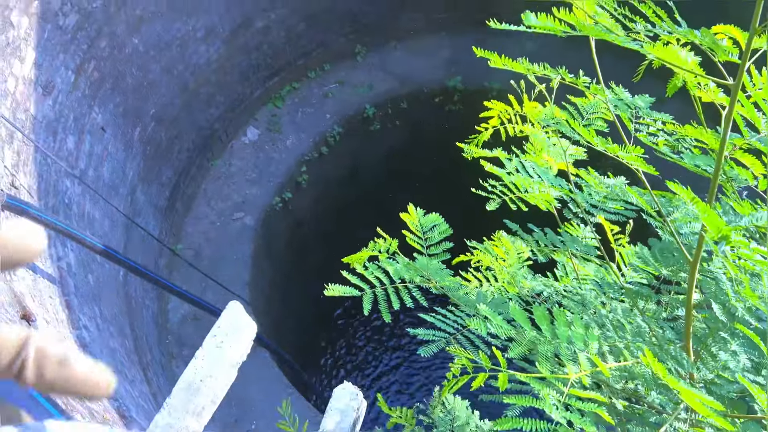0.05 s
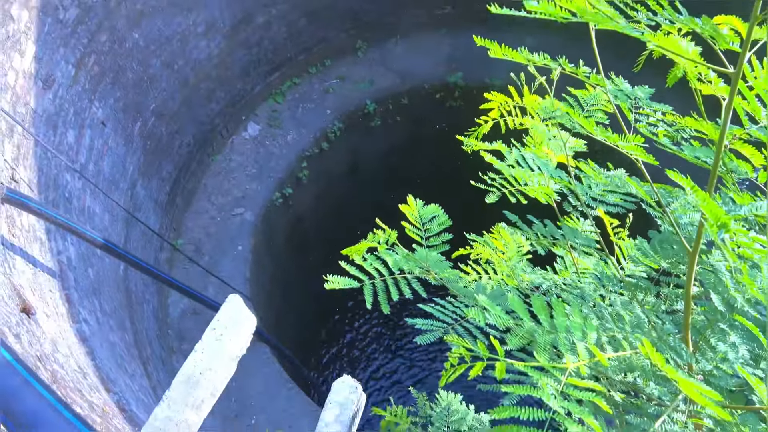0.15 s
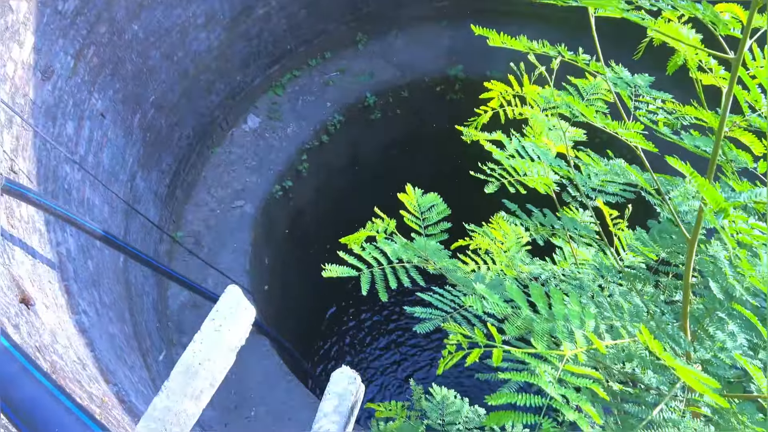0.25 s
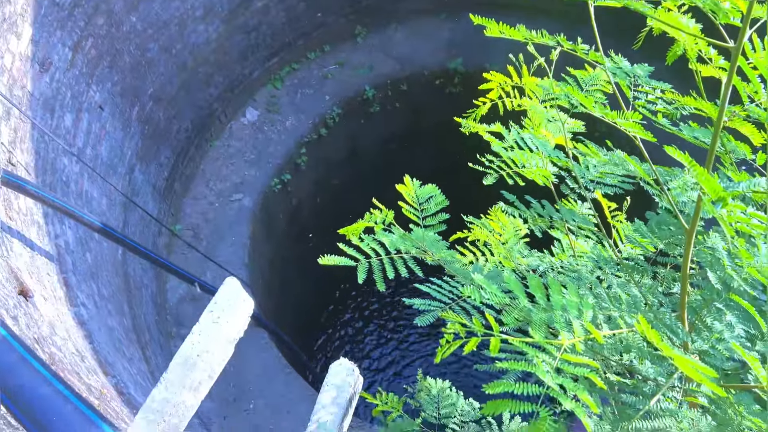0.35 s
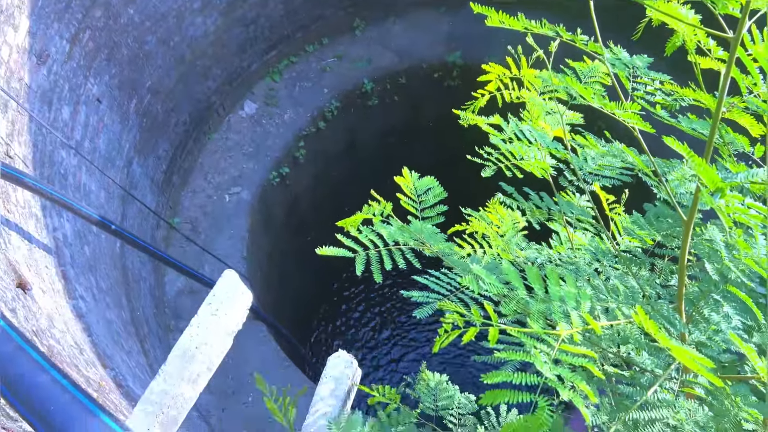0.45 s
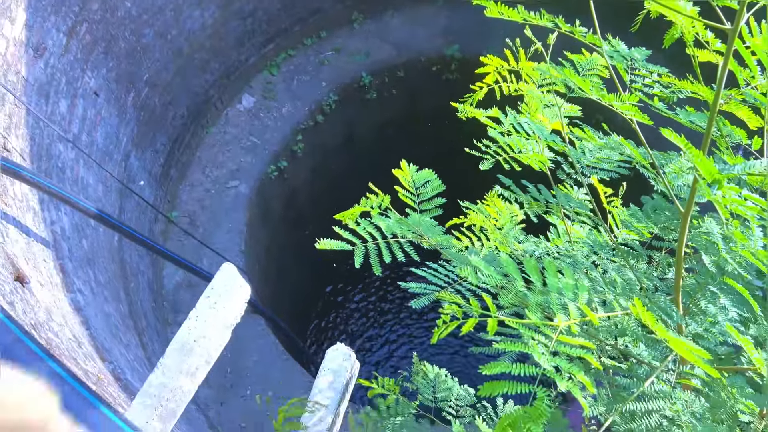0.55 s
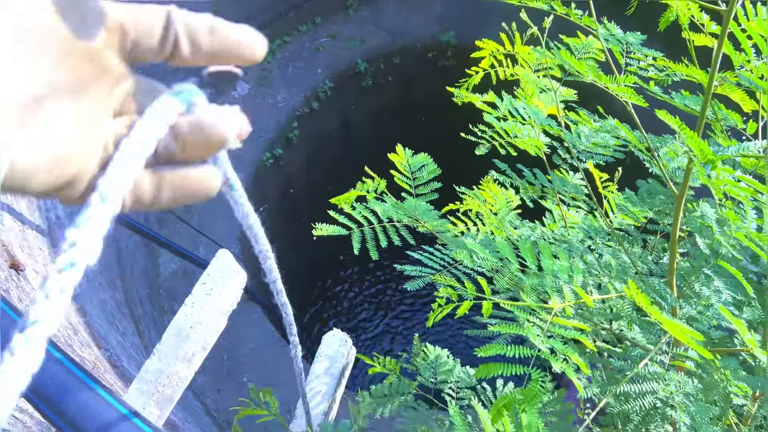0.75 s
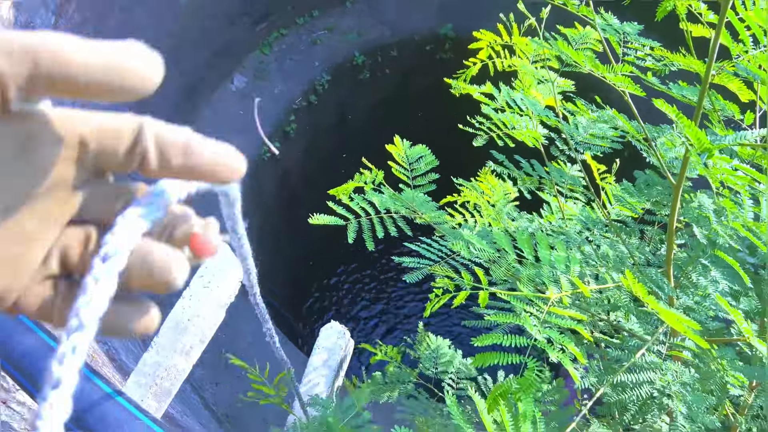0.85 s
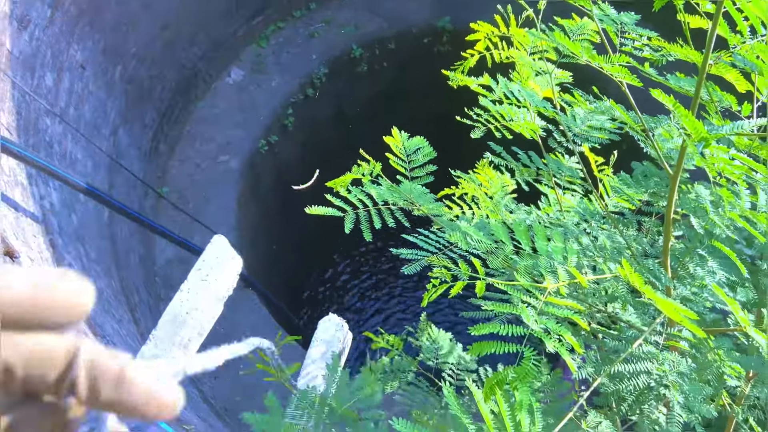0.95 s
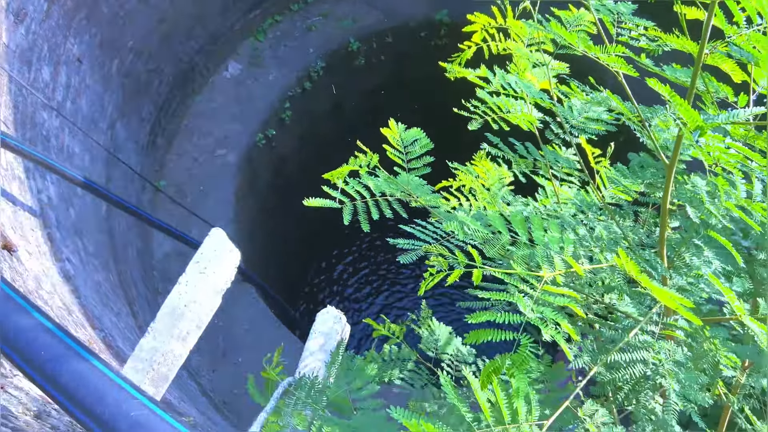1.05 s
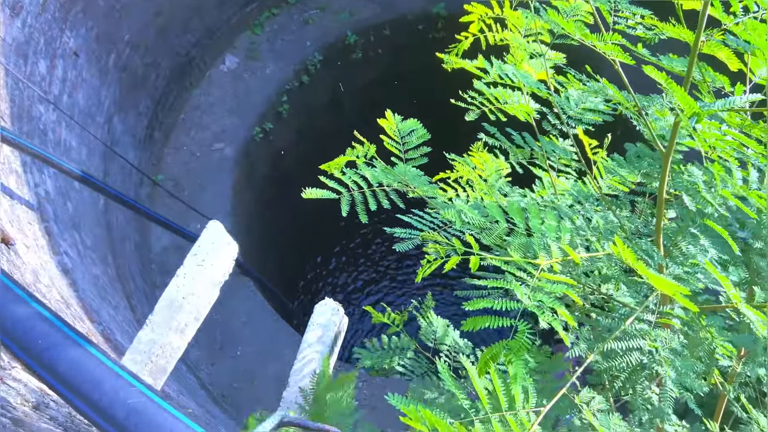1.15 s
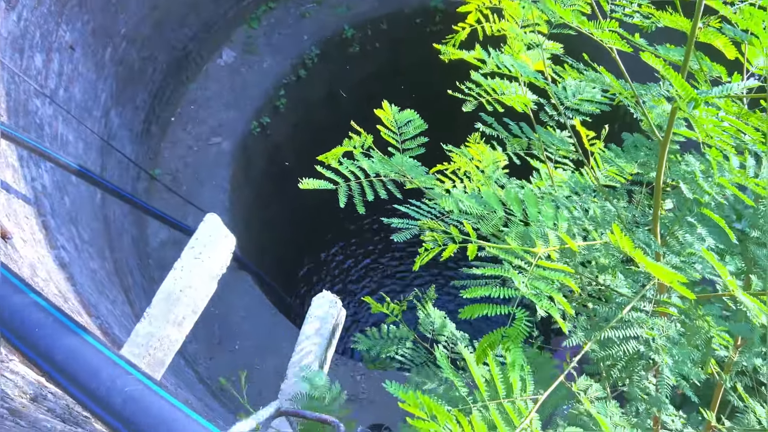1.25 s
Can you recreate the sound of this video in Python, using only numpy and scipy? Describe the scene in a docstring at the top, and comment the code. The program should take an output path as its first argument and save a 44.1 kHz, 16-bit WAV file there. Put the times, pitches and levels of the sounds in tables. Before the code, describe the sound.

Something hits the water in a stone well with a low, echoing thud and muffled splash.

```python
"""A breath of leaves and outdoor air, then a dull slap: something has dropped into a deep stone well.
A hollow boom throbs up the shaft with a muffled splash, and the air column rings on in beating
resonances among the wall echoes. Three drips plop on the water. At the rim a rope is handled, all soft
bumps and brief scuffs, while the leaves crackle on over a bed of hiss and faint rumble."""
import sys
import numpy as np
from scipy import signal
from scipy.fft import rfft, irfft
from scipy.io import wavfile
from scipy.ndimage import uniform_filter1d

SR = 44100
rng = np.random.default_rng(int(sys.argv[2]) if len(sys.argv) > 2 else 0)


def dump_mix(stems):
    """Bounce the given channels to the path in sys.argv[1] as a 16-bit WAV at rate SR."""
    frames = np.atleast_2d(stems).T  # one column per channel
    limited = np.clip(frames, -1, 1)  # hard clip at full scale
    pcm = np.round(limited * 32767).astype(np.int16)
    wavfile.write(sys.argv[1], SR, pcm)


N = 57330
T = np.arange(N) / SR

# Body of the slap: (frequency [Hz], relative level [dB], 60 dB decay time [s])
SLAP_RESONANCES = [(160, -1.5, .08), (328.6, -2.5, 0.12), (426, -7.5, 0.079), (748, 4, 0.016),
                   (878, -6.5, 0.034), (1287, -11.5, 0.054), (1430, -37, .016)]
# Pulses of the boom: (time [s], pitch [Hz], level [dB], attack [s], left over right [dB])
BOOM_THROBS = [(0.2429, 304, -12.5, 0.01, 2.5), (0.258, 142, -19.5, 0.0097, 3),
               (.263, 439.5, -30.5, 0.0091, -14), (.264, 281, -15, 0.0045, 13),
               (.277, 283.5, -11, 0.014, 10.5), (.305, 303.2, -16.5, 0.018, 10),
               (.318, 149, -22.5, 0.016, 5), (.362, 309, -34.5, 0.011, 9), (.37, 157, -25.5, 0.0096, 2),
               (.445, 292, -30.5, 0.014, 13)]
# Tone of the muffled splash: (frequency [Hz], relative level [dB])
SPLASH_EQ = [(60, -11), (100, 3), (210, 1), (380, 2), (470, -2), (580, -1.5), (720, -12), (1300, -19.5),
             (1900, -22.5), (5000, -55)]
# Ring of the air column: (frequency [Hz], relative level [dB], 60 dB decay time [s])
SHAFT_RESONANCES = [(101, -13, 0.28), (127, -1, 0.34), (145.2, -13, 0.71), (151.4, -7, 1.62),
                    (171, -20, 1.5), (268.1, 2, 0.53), (305.3, -4.5, 0.63), (307.2, -9, 1.36),
                    (316, -8, 0.57)]
# Tone of the boom's wall echoes: (frequency [Hz], relative level [dB])
ECHO_EQ = [(60, -30), (100, -10), (148, 1.5), (205, -8), (262, 1), (305, 7.5), (370, -12.5), (560, -22),
           (900, -20), (1400, -24), (2200, -61)]
# Drips on the water: (time [s], pitch [Hz], level [dB], attack [s])
DRIP_CUES = [(.481, 798, -31, 0.0054), (.517, 820, -38.5, 0.0046), (1.192, 783, -37, 0.0046)]
# Tone of the drips' wall echoes: (frequency [Hz], relative level [dB])
DRIP_ECHO_EQ = [(300, -30), (600, -11), (800, -13), (950, -5), (1200, -7), (2500, -31)]
# Handling bumps at the rim: (time [s], pitch [Hz], level [dB], attack [s])
BUMP_CUES = [(.818, 251, -44.5, 0.0073), (.847, 251, -34, 0.0042), (.849, 375, -38, 0.003),
             (0.852, 131.5, -38.5, 0.01), (0.889, 145.5, -44, 0.043), (.978, 254, -35, 0.0056),
             (.995, 250.5, -43, 0.015), (1.0, 59, -55, 0.0092), (1.081, 63.7, -41.5, 0.0089),
             (1.087, 114, -44, 0.0078), (1.144, 233, -39, 0.004)]
# Rope scuffs: (time [s], band centre [Hz], level [dB], attack [s])
SCUFF_CUES = [(.362, 4700, -35.5, .004), (.592, 3200, -35, .002), (.811, 1360, -38.5, 0.0047),
              (.846, 1310, -40.5, .006), (1.14, 3850, -45, 0.0028), (1.2005, 3470, -29.5, 0.0019)]
# Rise and fall of the leaves: (time [s], level [dB])
LEAF_FADER = [(0, -55), (.06, -45), (.18, -46.5), (.26, -46), (.29, -40), (.325, -48), (.35, -42),
              (.5, -41.5), (.66, -47), (.815, -42.5), (.845, -38.5), (.9, -38), (.96, -43), (.995, -41.5),
              (1.06, -46.5), (1.115, -38.5), (1.2, -41.5), (1.3, -48.5)]
# Tone of the leaves: (frequency [Hz], relative level [dB])
LEAF_EQ = [(300, -5), (1000, -4.5), (2000, -0.5), (3000, -1.5), (4600, 2), (7000, -3), (10000, -7),
           (13000, -7.5), (15500, -21)]
# Air hiss common to both ears: (frequency [Hz], relative level [dB])
AIR_MID_EQ = [(350, -17), (430, -11.5), (620, -5), (780, 2), (1000, -6), (1290, -2.5), (1820, -11),
              (2750, -4), (4700, -8), (7050, -10.5), (9700, -18.5), (12800, -10), (15000, -20.5)]
# Air hiss opposite in the two ears: (frequency [Hz], relative level [dB])
AIR_SIDE_EQ = [(350, -13), (450, -18), (750, -1), (1000, -5), (1500, 1), (2200, -8.5), (3400, -3.5),
               (8000, -12), (10000, -6), (12500, -32), (15000, -11.5)]
# Tone of the rumble: (frequency [Hz], relative level [dB])
RUMBLE_EQ = [(20, -19), (40, -20), (62, 1.5), (100, -9.5), (148, -1.5), (200, -13), (260, -8), (400, -17),
             (900, -36)]
# Rise and fall of the rumble: (time [s], level [dB])
RUMBLE_FADER = [(0, -55), (.78, -52.5), (.9, -47.5), (1.1, -51), (1.3, -53)]

WELL_PAN_DB, WELL_WIDTH = 4.5, 0.62
SLAP_AT_S, SLAP_ATTACK_S, SLAP_GAIN_DB = 0.2305, 0.0011, -19.5
SHAFT_AT_S, SHAFT_ATTACK_S, SHAFT_GAIN_DB = 0.252, 0.011, -24
ECHO_GAIN_DB, ECHO_T60_S = -27.5, 1
DRIP_SEND_DB, DRIP_ECHO_T60_S = -16.5, 0.44
SCUFF_STEP_OCTAVES = 0.42
CRACKLES_PER_S, CRACKLE_SPREAD_DB, CRACKLE_DECAY_S = 900, 2, 0.0021
AIR_MID_GAIN_DB, AIR_SIDE_GAIN_DB, AIR_FLICKER_DB = -42.5, -41.5, 2.28
TOP_HZ = 15300


def slap():
    """The hit: the impact sets off short resonances, with a softened edge and trimmed bass."""
    attack = 1 - np.exp(-since(SLAP_AT_S) / SLAP_ATTACK_S)
    body = highpass(attack * ring(SLAP_AT_S, SLAP_RESONANCES), hz=168)
    return pan(undb(SLAP_GAIN_DB) * body, WELL_PAN_DB)


def boom():
    """Hollow, overlapping pulses of resonance throb up the shaft."""
    return sum(pan(throb(start, hz, db, attack, shape=2.7), pan_db)
               for start, hz, db, attack, pan_db in BOOM_THROBS)


def splash():
    """The water gives one muffled burst of dark noise."""
    envelope = undb(-26) * swell(start=0.248, attack=0.015)
    return pan(envelope * wide_noise(SPLASH_EQ, WELL_WIDTH), WELL_PAN_DB)


def shaft():
    """The air in the well builds up and rings on in close, beating modes, among scattered wall echoes."""
    age = since(SHAFT_AT_S)
    build = 1 - np.exp(-age / SHAFT_ATTACK_S)
    echoes = undb(ECHO_GAIN_DB - 60 * age / ECHO_T60_S) * wide_noise(ECHO_EQ, WELL_WIDTH)
    modes = undb(SHAFT_GAIN_DB) * ring(SHAFT_AT_S, SHAFT_RESONANCES)
    return pan(build * (modes + echoes), WELL_PAN_DB)


def drips():
    """Small plops on the water, each trailing a faint wash from the walls."""
    plops = sum(throb(start, hz, db, attack) for start, hz, db, attack in DRIP_CUES)
    tails = sum((T > start + attack) * undb(db - 60 * since(start) / DRIP_ECHO_T60_S)
                for start, _, db, attack in DRIP_CUES)
    wash = np.array([noise(DRIP_ECHO_EQ), noise(DRIP_ECHO_EQ)])
    return pan(plops, db=-5.5) + undb(DRIP_SEND_DB) * tails * wash


def rope():
    """A rope handled at the rim: soft, low bumps and brief scuffs of band noise."""
    bumps = sum(throb(start, hz, db, attack, shape=0.81) for start, hz, db, attack in BUMP_CUES)
    scuffs = np.zeros((2, N))
    for start, hz, db, attack in SCUFF_CUES:
        band = [(hz * 2 ** (step * SCUFF_STEP_OCTAVES), -6 * step ** 2) for step in range(-3, 4)]
        scuffs += undb(db) * swell(start, attack, shape=0.76) * np.array([noise(band), noise(band)])
    return pan(bumps, db=5.5) + scuffs


def leaves():
    """Dense, tiny crackles of uneven size blur into a wide rustle."""
    sizes = undb(CRACKLE_SPREAD_DB * np.minimum(rng.exponential(size=N), 5))
    triggers = rng.random(N) < CRACKLES_PER_S / SR
    decay = np.exp(-1 / (CRACKLE_DECAY_S * SR))
    energy = signal.lfilter([1], [1, -decay], (sizes * triggers) ** 2)
    mid, side = (equalise(np.sqrt(energy) * rng.standard_normal(N), LEAF_EQ) for _ in range(2))
    return fader(LEAF_FADER) * mid_side(mid, 0.88 * side)


def air():
    """The outdoor bed: a wide, lightly flickering hiss over a faint rumble."""
    mid = undb(AIR_MID_GAIN_DB) * noise(AIR_MID_EQ)
    side = undb(AIR_SIDE_GAIN_DB) * noise(AIR_SIDE_EQ)
    hiss = highpass(mid_side(mid, side), hz=357)
    rumble = fader(RUMBLE_FADER) * wide_noise(RUMBLE_EQ, width=0.39)
    flicker = undb(AIR_FLICKER_DB * wander(rate_hz=41.07))
    return hiss * flicker + rumble


def ring(start, modes):
    """Decaying modes struck at one moment."""
    age = since(start)
    return sum(undb(db - 60 * age / t60) * np.sin(2 * np.pi * hz * age) for hz, db, t60 in modes)


def throb(start, hz, db, attack, shape=2):
    """One resonance that swells and dies."""
    return undb(db) * swell(start, attack, shape) * np.sin(2 * np.pi * hz * (T - start))


def swell(start, attack, shape=2):
    """A rounded rise to 1 over attack seconds, then a longer fall; a higher shape is tighter."""
    progress = since(start) / attack
    return (progress * np.exp(1 - progress)) ** shape


def since(start):
    """Seconds since a cue, zero before it."""
    return np.maximum(T - start, 0)


def fader(points):
    """Gain riding along (time [s], level [dB]) points."""
    return undb(np.interp(T, *np.array(points).T))


def wander(rate_hz):
    """Glides between random values with a spread near 1."""
    hold = int(SR / rate_hz)
    steps = np.repeat(rng.standard_normal(N // hold + 1), hold)
    return uniform_filter1d(steps, hold)[:N]


def equalise(x, eq):
    """Shape x along (frequency [Hz], level [dB]) points and scale it to rms 1."""
    hz, db = np.array(eq).T
    bin_hz = np.maximum(np.arange(N // 2 + 1) * SR / N, 1)
    gain = undb(np.interp(np.log(bin_hz), np.log(hz), db))
    shaped = irfft(rfft(x) * gain, N)
    return shaped / shaped.std()


def noise(eq):
    """Mono noise with the tone of eq."""
    return equalise(rng.standard_normal(N), eq)


def wide_noise(eq, width):
    """Stereo noise; width is the ratio of side to mid."""
    return mid_side(noise(eq), width * noise(eq))


def highpass(x, hz):
    """Roll off the bass below hz."""
    return signal.sosfilt(signal.butter(2, hz, "high", fs=SR, output="sos"), x)


def mid_side(mid, side):
    """Mid and side to left and right."""
    return np.array([mid + side, mid - side])


def pan(x, db):
    """Tip the balance: left over right by db."""
    return x * undb(np.array([[db], [-db]]) / 2)


def undb(db):
    """Decibels to gain."""
    return 10 ** (np.asarray(db) / 20)


def scene():
    """The mix: the well up front, the rope at its rim, leaves and air behind."""
    well = slap() + boom() + splash() + shaft() + drips()
    return well + rope() + pan(leaves() + air(), db=0.86)


def record(dry):
    """A steep low-pass takes off the very top."""
    return signal.sosfilt(signal.ellip(10, .2, 80, TOP_HZ, fs=SR, output="sos"), dry)


dry = scene()
out = record(dry)
dump_mix(out)
```